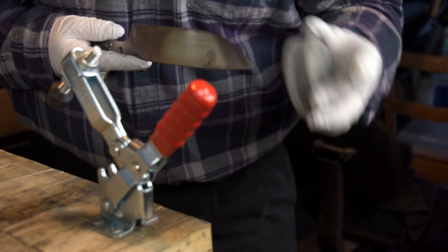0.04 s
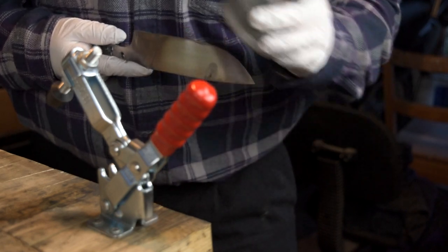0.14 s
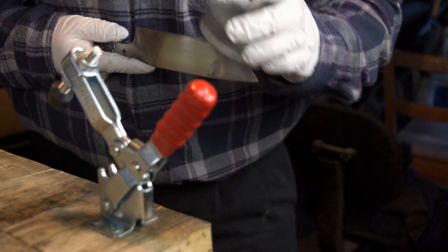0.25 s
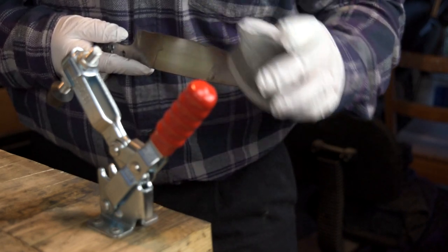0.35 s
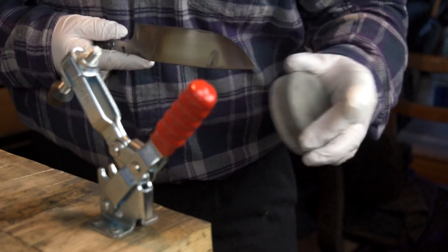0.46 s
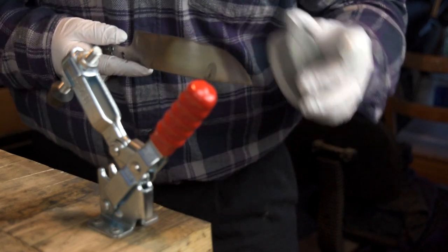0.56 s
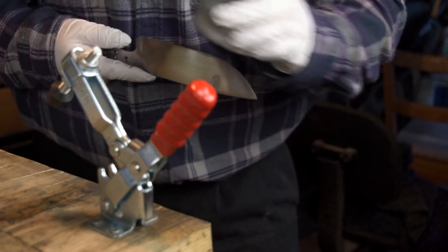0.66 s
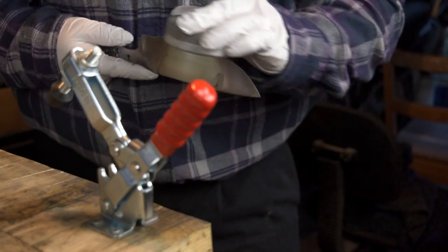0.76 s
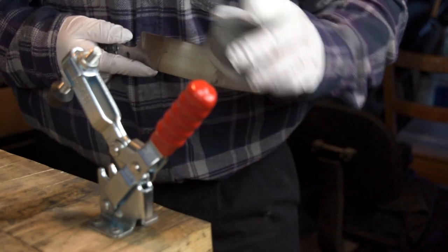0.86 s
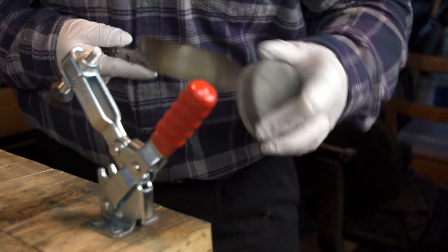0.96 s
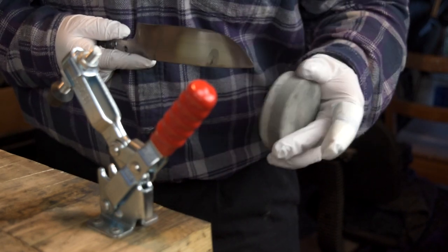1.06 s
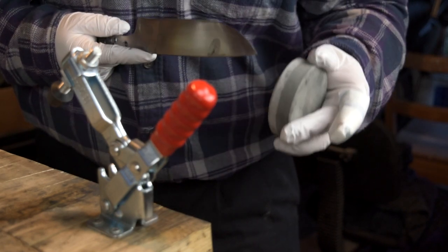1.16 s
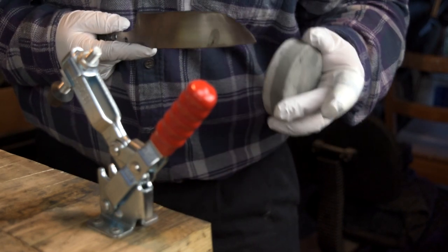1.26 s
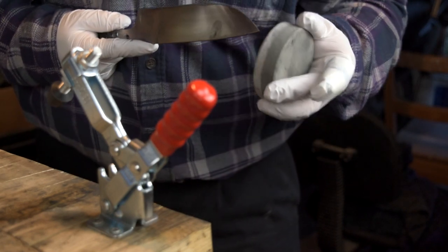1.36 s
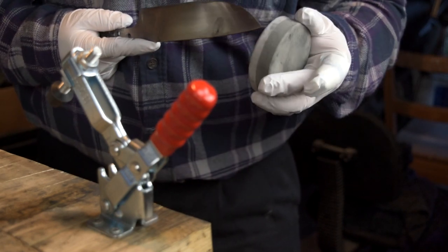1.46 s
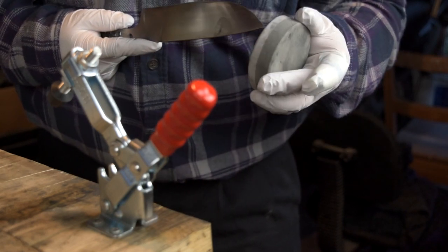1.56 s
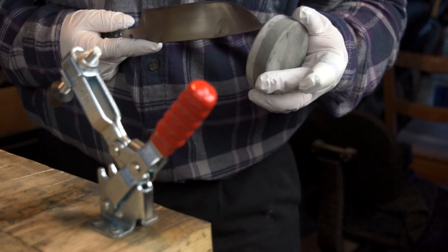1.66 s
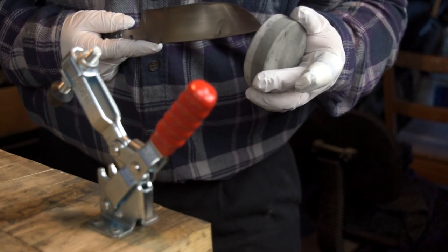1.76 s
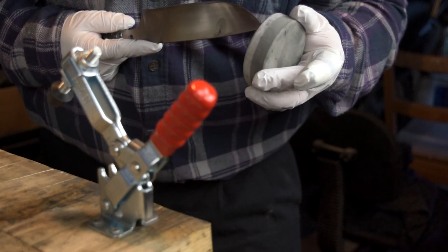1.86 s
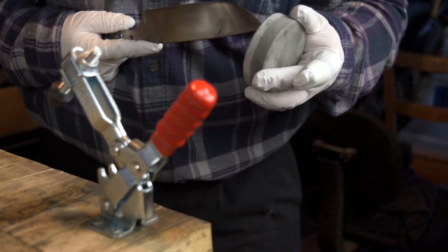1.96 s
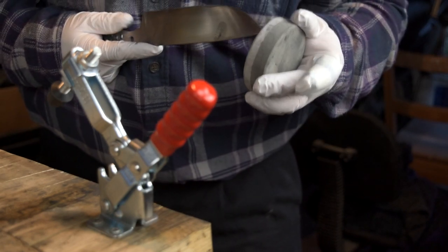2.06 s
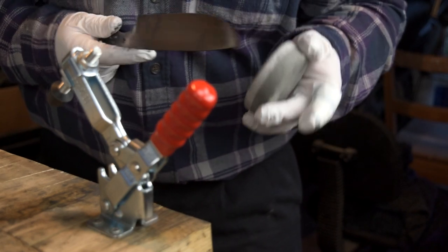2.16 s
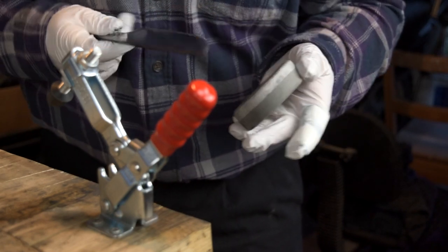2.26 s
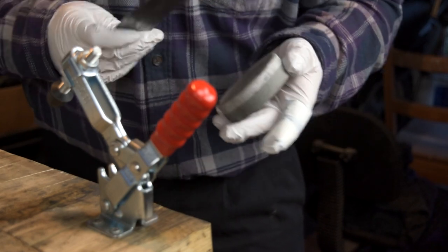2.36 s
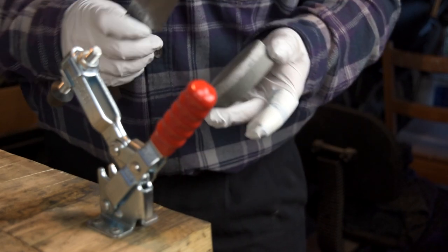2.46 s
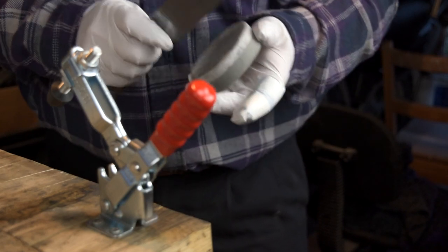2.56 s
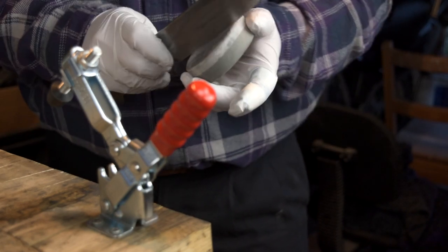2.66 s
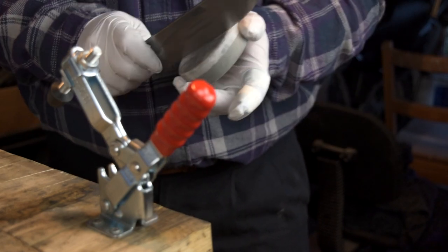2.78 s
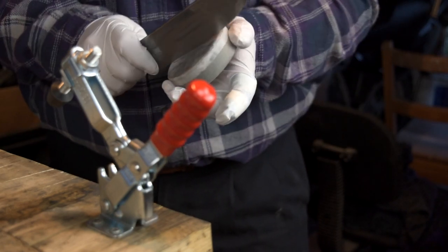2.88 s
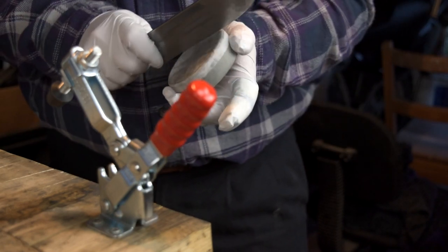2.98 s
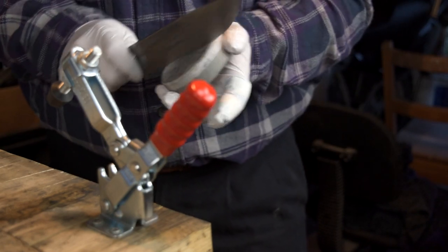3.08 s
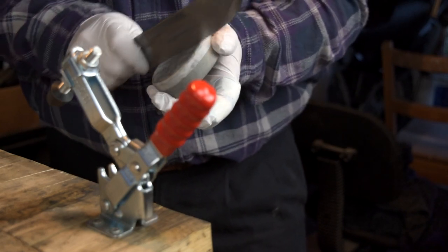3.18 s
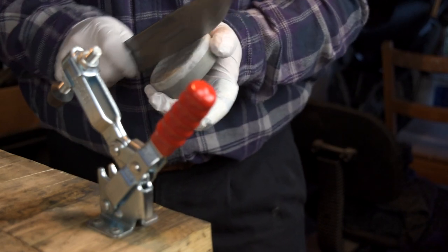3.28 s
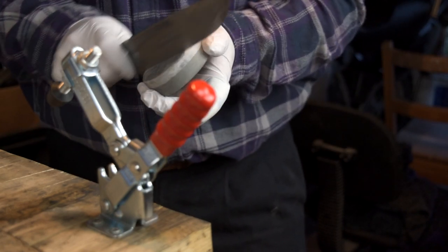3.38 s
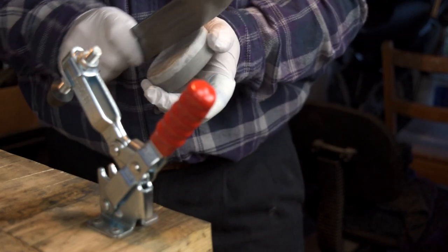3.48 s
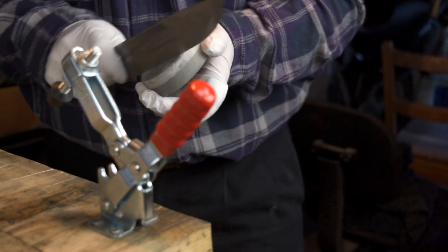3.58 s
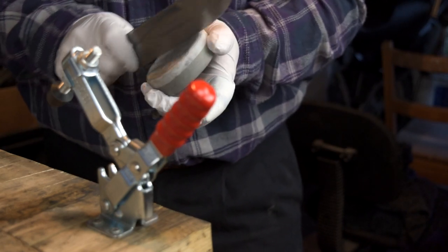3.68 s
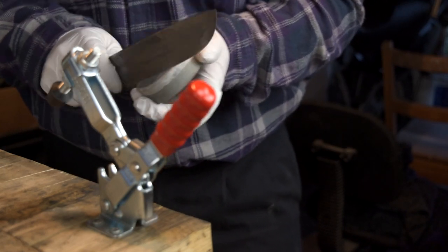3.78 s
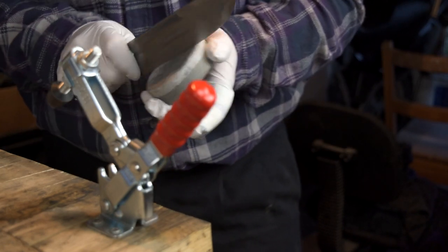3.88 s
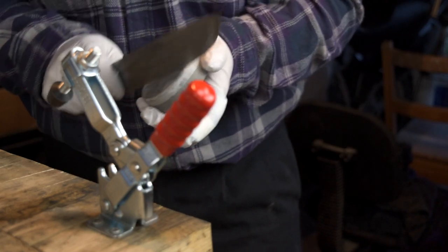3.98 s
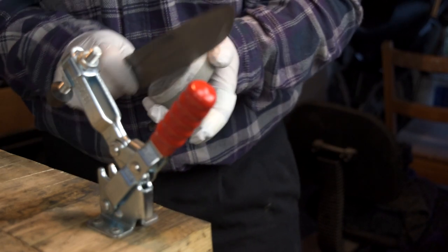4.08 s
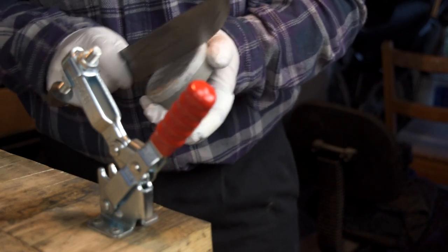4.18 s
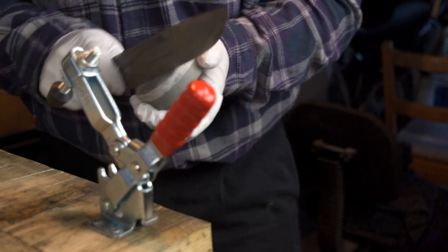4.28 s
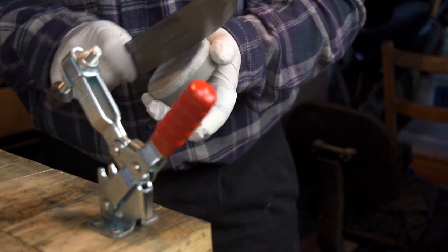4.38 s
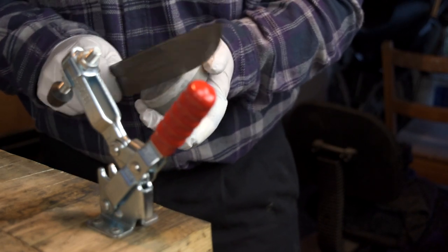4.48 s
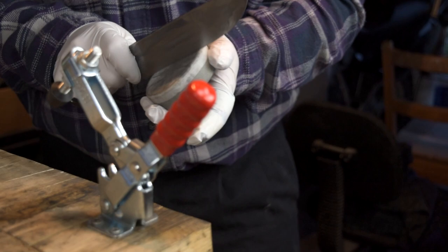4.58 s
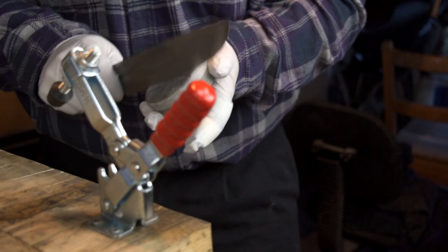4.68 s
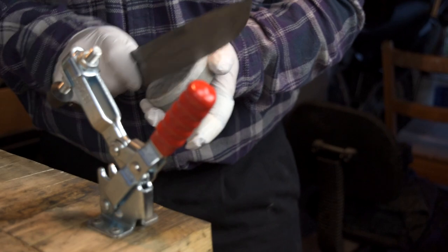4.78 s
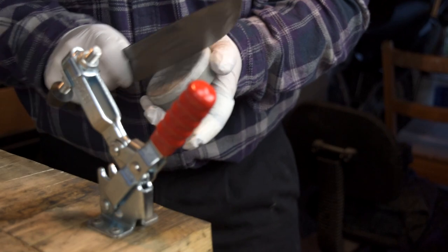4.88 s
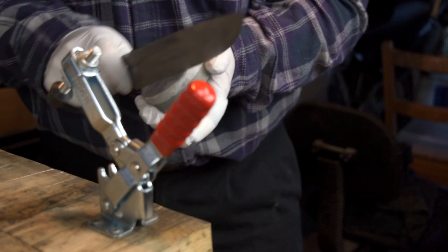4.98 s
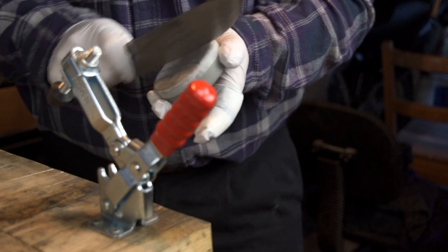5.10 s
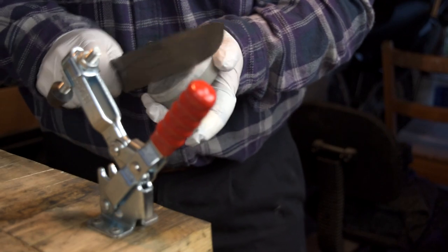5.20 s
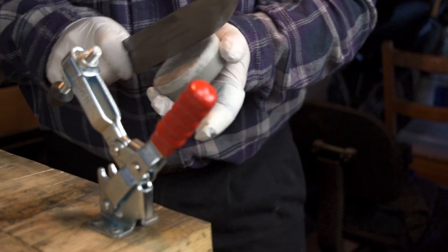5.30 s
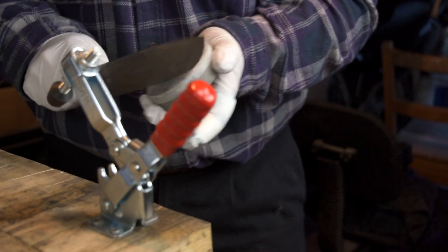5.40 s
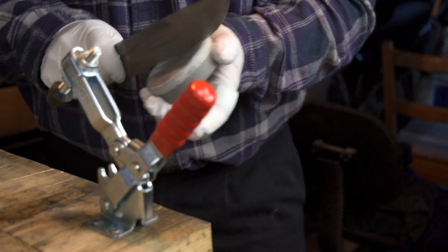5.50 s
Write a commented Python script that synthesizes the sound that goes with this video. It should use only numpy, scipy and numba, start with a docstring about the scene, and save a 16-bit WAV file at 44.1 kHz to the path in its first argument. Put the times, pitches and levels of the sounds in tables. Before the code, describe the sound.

A sharpening stone lands on a steel knife with a short clack at about 0.25 seconds and wipes lightly along the blade. A second clack and scrape follow at 0.75 seconds, brightening as the stone leaves the tip around 1 second. A quieter stretch holds only faint touches on the steel. From about 2.2 seconds a rubber glove slides softly along the blade and a sleeve swishes. At 2.7 seconds a sharp tap makes the blade ring briefly, and the stone clacks down again just after. From 2.9 seconds to the end, around 5.5 seconds, the stone rubs rapidly back and forth, about nine strokes a second, louder, gritty and metallic, with tiny high squeaks. Soft sleeve rustle and faint low thudding from the arms accompany the strokes. The sound is close, in a small, dry workshop with a faint low hum.

```python
"""A round stone hones a steel knife: grit drives the blade's modes, whose gain and pitch wander as the
contact travels. The stone lands with a clack and is wiped off the tip twice; a glove slides and the
blade is tapped as the grip changes; then the stone lands again and rubs quickly to and fro, with
stick-slip squeaks. Sleeves rustle, and the small, dry workshop adds short reflections and a low hum."""
import sys
import numpy as np
from scipy import signal
from scipy.fft import rfft, irfft
from scipy.io import wavfile
from numba import njit

SR = 44100
rng = np.random.default_rng(int(sys.argv[2]) if len(sys.argv) > 2 else 0)


def store_wav(level_fs):
    """Save 16-bit WAV to argv[1]."""
    pcm = np.round(np.clip(np.atleast_2d(level_fs), -1, 1) * 32767)
    wavfile.write(sys.argv[1], SR, pcm.T.astype(np.int16))


N = 244572
TIME = np.arange(N) / SR

# quick strokes, pull and push in turn: start t/s, level/dB, edge-mode gain/dB, nominal bending f/Hz
STROKES = [(2.93, -23, 1.5, 736), (3.056, -23, 2, 850), (3.169, -22.5, 5, 494), (3.295, -23.5, 4.5, 686),
           (3.405, -22.5, 3.5, 593), (3.519, -23, 6, 698), (3.621, -21.5, 1.7, 610),
           (3.737, -23.5, 2.5, 714), (3.841, -21, 4.5, 624), (3.962, -23.5, 5, 705),
           (4.074, -21.5, 3.5, 630), (4.198, -23.5, 5, 735), (4.313, -20.5, -0.5, 673),
           (4.429, -23, 8.5, 794), (4.540, -22.5, 0.5, 710), (4.661, -25.5, -5, 820),
           (4.771, -21, 7.5, 704), (4.901, -24, 6.5, 750), (5.011, -22, 0.5, 710), (5.138, -22, -2.5, 1020),
           (5.23, -23.5, 10.5, 846), (5.358, -22, -8, 945), (5.467, -23, 2.5, 855)]
# modes of the blade under the stone: f/Hz, bandwidth/Hz, push gain/dB, pull gain/dB, wipe gain/dB
BLADE_MODES = [(1150, 590, -14.5, -33.5, -5), (1390, 104, -7.5, -14.5, -4), (1698, 74, -5, -9, -35),
               (1958, 313, -2, -4, -11), (2290, 356, -9, -3.5, -7.5), (2575, 103, -1, 0.5, -31),
               (2880, 390, 2.5, -1.5, -4.5), (3154, 160, -3, 2.5, -5), (3390, 153, 0, -0.5, -10),
               (3857, 330, -3.5, -5.5, -3), (4504, 118, -1, 0.5, -6), (5660, 105, -7.5, -5, -9.5),
               (6924, 146, -7, -5.5, -8), (7775, 87, -11.5, -8, -5.5), (8310, 240, -16.5, -11, -4.5),
               (9600, 180, -8, -9, -20), (10140, 1100, -18.5, -16.5, -6.5), (11270, 220, -14, -9, -10.5),
               (11730, 1250, -14.5, -15.5, -13), (12760, 370, -16, -9, -29), (13980, 110, -22, -31, -16),
               (14120, 380, -13.5, -13.5, -10)]
# coarse grains catching during the strokes: t/s, level/dB
GRAIN_CATCHES = [(2.9705, 2.5), (3.005, -4), (3.070, -9), (4.712, -5), (4.729, -8.5), (4.959, -4)]
# hiss of the grit: f/Hz, spectrum level/dB
GRIT_SPECTRUM = [(350, -4), (700, -5.5), (1500, -2.5), (3000, -1), (5000, 3.5), (9000, 1.5), (13000, -31),
                 (15800, -5.5)]
# glide of the bending resonance: fraction of stroke, frequency ratio on the pull, ratio on the push
BEND_GLIDE = [(.27, 1.06, 1.315), (.53, 0.93, 0.96), (.77, 1.12, .9)]
# stick-slip squeaks: t/s, level/dB, half-width/s
SQUEAKS = [(3.008, -10, 0.0034), (3.444, -12, 0.0053), (3.779, -4.5, 0.0061), (3.825, -7.5, 0.0044),
           (4.036, -7.5, 0.0032), (4.488, -7.5, 0.0064), (4.96, -5.5, 0.0036), (5.047, -13, .009),
           (5.282, -8.5, 0.011)]
# slow wipes: start t/s, duration/s, level/dB, dulling on landing/dB, tip t/s, swell at the tip/dB
WIPES = [(0.249, 0.22, -35.5, 5.5, 0.43, -0.5), (0.758, 0.27, -33.5, 26, 1.009, 6),
         (2.829, 0.1137, -38.5, 29, 2.921, -1)]
# the stone landing flat on the blade: t/s, level/dB, f/Hz
KNOCKS = [(0.2515, 1, 1540), (0.2546, -2.5, 2220), (0.761, 0.5, 1660), (2.8252, -6, 2740),
          (2.8270, 1, 1950)]
# modes of stone and blade together: f/Hz, level/dB, T60/s
CLACK_MODES = [(740, -24, 0.011), (2570, -9.5, 0.0064), (2800, -12.5, 0.026), (3320, -11, 0.013),
               (5500, -18.5, 0.002), (7580, -31, 0.027), (8600, -28, 0.04), (11400, -34, 0.0063),
               (13600, -33, .01)]
# light touches, and the blade springing free: t/s, level/dB, damping factor (about 1 when free)
TAPS = [(1.012, -14, 1.6), (1.754, -19.5, 3.5), (2.102, -25, 2.2), (2.193, -26, 3), (2.528, -15.5, 3.3),
        (2.691, 0.5, 0.92)]
# modes of the free blade: f/Hz, level/dB, T60/s
FREE_MODES = [(680, -16, 0.0015), (2100, -0.5, 0.0019), (2570, -21, 0.1), (3710, -40, 0.13),
              (5650, -19, 0.034), (6971, -18, 0.034), (7730, -23.5, 0.052), (8260, -22, .012),
              (9800, -22.5, 0.029), (11500, -25, .014), (14000, -33, .016)]
# the glove sliding along the blade: t/s, half-width/s, level/dB, treble gain/dB
GLOVE_SLIDES = [(2.263, 0.075, -57.5, 11), (2.43, 0.021, -47, -15), (2.536, 0.019, -43.5, -2),
                (2.55, 0.17, -50.5, -5)]
# resonances excited by the glove: f/Hz, bandwidth/Hz, level/dB
GLOVE_MODES = [(3250, 650, -1), (4500, 140, -2.5), (5670, 370, -10), (6950, 150, -12), (8000, 450, -11.5)]
# thudding of the arms: f/Hz, bandwidth/Hz, level at the first stroke/dB, level at the last/dB
ARM_BANDS = [(55.6, 26, -47, -59), (91.3, 19, -63.5, -40.5), (125, 33, -57, -56.5)]
# dull rub of the sleeves, growing as the arms start work: t/s, level/dB
SLEEVE_LEVELS = [(0, -52.5), (.4, -52.5), (1.1, -52), (1.9, -52), (2.25, -46.5), (5.55, -46)]
# colour of that rub: f/Hz, spectrum level/dB
RUB_SPECTRUM = [(120, -3), (200, -8.5), (348, -10), (407, -5.5), (854, -4), (985, -5.5), (1120, -6),
                (6000, -38), (7800, -72), (13200, -120)]
# a sleeve swinging past: t/s, half-width/s, level/dB
SWISHES = [(0.045, 0.13, -49.5), (1.077, .2, -60.5), (2.455, .26, -49.5)]
# colour of the swish: f/Hz, spectrum level/dB
SWISH_SPECTRUM = [(880, -33), (1500, -16), (2020, -6.5), (3270, -0.5), (3820, -8.5), (4500, -5.5),
                  (5050, -16), (8250, -24), (15000, -34)]
# wavering room hum: f/Hz, bandwidth/Hz, level/dB
HUM_BANDS = [(58.7, 4.8, -56), (174.6, 8.8, -55), (212, 6.4, -60.5)]
# room rumble: f/Hz, spectrum level/dB
ROOM_SPECTRUM = [(15, -16), (30, -3), (50, -17), (110, 0), (230, -7.5), (300, -14.5), (500, -11),
                 (800, -38), (1200, -12), (2000, -27), (4300, -33.5), (15000, -34)]

TOUCH_S, ATTACK_S, LAST_TURN_S = 2.943, 0.0076, 5.58   # the stone meets the blade already moving
FASTEST_PULL, FASTEST_PUSH = 0.43, 0.46   # fraction of a stroke at which speed peaks
PULL_TREBLE_DB, PUSH_TREBLE_DB = 1.53, 4
BITE_DB, BITE_S = 4, 0.017   # sharp scratch at first contact
FLEX_DB, FLEX_PER_EDGE_DB = -4.5, -0.37   # on its edge the blade sings, laid flat it bends
FLEX_LAG_DB, FLEX_BUILD_S = 6, 0.12   # the hands need a moment to lean on the blade
SQUEAK_HZ, SQUEAK_WAVER = 3397, 0.0069
SING_DB, SING_SPREAD_DB = -7.5, 3.5   # weaker, chance squeaks, relative to their drive
LANDING_DB, SETTLE_S, LIFT_S, TIP_S = 17.5, 0.018, 0.0099, 0.016   # pressure envelope of a wipe
SLIDE_BRIGHT_DB, GATHER_BRIGHT_DB, TIP_BRIGHT_DB = 0.5, 4.5, 4.5   # speed and the thin tip add treble
FULL_WIPE_S = 0.23   # time to cross the blade; a shorter wipe stays near the heel
CONTACT_END_HZ, CONTACT_MID_HZ = 1900, 2740
WIPE_FLEX_END_DB, WIPE_FLEX_MID_DB = -6, -22   # the blade bends most at heel and tip


def honing():
    """Sliding friction: the speed and pressure of each stroke set the force of the grit on the steel."""
    start, stroke_db, stroke_edge_db, mid_hz = np.transpose(STROKES)
    turns = np.append(start, LAST_TURN_S)
    length = np.diff(turns)
    fastest = start + np.resize([FASTEST_PULL, FASTEST_PUSH], len(start)) * length
    half_strokes = np.sort(np.append(turns, fastest))
    phase = np.interp(TIME, half_strokes, np.arange(len(half_strokes)) / 2)   # one unit a stroke
    velocity = np.sin(np.pi * phase)
    speed = np.abs(velocity)
    pull = np.clip(0.5 + 1.9 * velocity, 0, 1)
    # each stroke holds its own pressure and ring, changing over at the turns
    held = np.ravel([start + 0.2 * length, start + 0.8 * length], order="F")
    level_db = np.interp(TIME, held, np.repeat(stroke_db, 2))
    edge_db = np.interp(TIME, held, np.repeat(stroke_edge_db, 2))
    age = np.maximum(TIME - TOUCH_S, 0)
    touching = np.minimum(age / ATTACK_S, 1)
    effort = touching * from_db(level_db + BITE_DB * np.exp(-age / BITE_S) + 1.38 * drift(46))
    friction = effort * (0.21 + np.tanh(1.084 * speed ** 2.08))   # never quite stops; saturates at speed
    grains = grit(per_s=14000, spread_db=3)
    catches = from_db(11.5) * cut(clicks(GRAIN_CATCHES), 3700, "low", order=1)
    gains_db = stroke_gains(pull, speed, edge_db)
    steel = from_db(-1) * blade(grains * friction + catches, gains_db, wander_db=3, detune=0.0038)
    hiss = from_db(-5) * coloured(grains, GRIT_SPECTRUM) * friction
    lag_db = FLEX_LAG_DB * np.exp(-age / FLEX_BUILD_S)
    flex_db = FLEX_DB + FLEX_PER_EDGE_DB * edge_db + drift(3.8) - lag_db
    load = effort * from_db(flex_db) * (0.085 + speed ** 2.4)
    flexing = bending(load, friction, phase, bend_pitch(start, length, mid_hz))
    return steel + hiss + flexing + touching * arms() + squeaks(effort * speed * from_db(edge_db))


def stroke_gains(pull, speed, edge_db):
    """Modal coupling: direction, speed and edge contact set the drive of each mode, in dB."""
    treble_db = PUSH_TREBLE_DB + (PULL_TREBLE_DB - PUSH_TREBLE_DB) * pull
    slow_db = -2.2 * (1 - speed)   # slow grains are duller
    return [push_db + (pull_db - push_db) * pull
            + (hz > 5000) * treble_db + (hz > 9000) * slow_db + (3200 < hz < 3600) * edge_db
            for hz, _, push_db, pull_db, _ in BLADE_MODES]


def blade(force, gains_db, wander_db, detune):
    """Modal superposition: the travelling contact feeds each mode unevenly and bends its pitch."""
    out = np.zeros(N)
    for k, ((hz, width_hz, *_), db) in enumerate(zip(BLADE_MODES, gains_db)):
        drive = force * from_db(db + wander_db * drift(10.1))
        mode_hz = hz * (1 + detune * drift(6.7))
        out += (-1) ** k * resonance(drive, mode_hz, width_hz)   # neighbours swing in opposite sense
    return cut(out, 840, "high")


def bending(load, friction, phase, bend_hz):
    """Flexural resonance: one mode glides, one stays, and a deeper one is excited in mid-stroke."""
    drive = grit(per_s=6000, spread_db=1) * load
    mid_stroke = np.sin(np.pi * (phase % 1) ** 1.54) ** 2
    gliding = from_db(3.5) * resonance(drive, bend_hz, width_hz=210)
    deep = from_db(-6.5) * resonance(drive * mid_stroke, 0.635 * bend_hz, width_hz=127)
    steady = from_db(-11) * resonance(grit(per_s=6500, spread_db=5) * friction, 750, width_hz=260)
    return cut(cut(gliding - deep + steady, 310, "high", order=4), 1900, "low")


def bend_pitch(start, length, mid_hz):
    """A moving support retunes a beam: the bending frequency in Hz through the strokes."""
    fraction, *ratios = np.transpose(BEND_GLIDE)
    times = start[:, None] + length[:, None] * fraction
    pitches = [hz * ratios[k % 2] for k, hz in enumerate(mid_hz)]
    return np.interp(TIME, times.ravel(), np.ravel(pitches))


def squeaks(drive):
    """Stick-slip oscillation briefly sustains the edge mode, with a weak second harmonic."""
    swell = sum(from_db(db) * bell(s, half_s) for s, db, half_s in SQUEAKS)
    chance_db = SING_DB + SING_SPREAD_DB * np.minimum(drift(38.7), 1.5)
    swell = np.maximum(swell, drive * from_db(chance_db))
    hz = SQUEAK_HZ * (1 + SQUEAK_WAVER * drift(30))
    angle = 2 * np.pi * np.cumsum(hz) / SR
    return swell * (np.sin(angle) + from_db(-17) * swell * np.sin(2 * angle))


def wipes():
    """Light friction: a slow pass drives the blade and a contact resonance that is highest mid-blade."""
    pressure, bright_db, arch = sum(wipe_motion(*row) for row in WIPES)
    contact_hz = CONTACT_END_HZ + (CONTACT_MID_HZ - CONTACT_END_HZ) * arch
    flex_db = WIPE_FLEX_END_DB + (WIPE_FLEX_MID_DB - WIPE_FLEX_END_DB) * arch
    effort = pressure * from_db(2.9 * drift(88))
    grains = grit(per_s=9000, spread_db=3)
    force = grains * effort
    gains_db = [db + bright_db * np.clip(np.log2(hz / 3000), -0.2, 1) for hz, *_, db in BLADE_MODES]
    steel = from_db(-9.5) * blade(force, gains_db, wander_db=3.5, detune=0.0065)
    contact = from_db(-6 + 3.9 * arch) * cut(resonance(force, contact_hz, width_hz=450), 5000, "low")
    flexing = from_db(flex_db - 2.5) * cut(resonance(force, 780, width_hz=390), 1900, "low")
    hiss = from_db(-7 + 0.92 * bright_db) * effort * coloured(grains, GRIT_SPECTRUM)
    crackle = resonance(grit(per_s=7500, spread_db=11), 5140, width_hz=900)
    tip = cut(from_db(-13.5 + bright_db) * effort * crackle, 6400, "low")
    return steel + contact + flexing + hiss + tip


def wipe_motion(start, length, level_db, dull_db, tip_s, tip_db):
    """Contact loading as the stone lands, slides and lifts: pressure, brightness, arch (1 mid-blade)."""
    age = np.clip(TIME - start, 0, length)
    fraction = age / length
    touching = (age > 0) * np.clip((length - age) / LIFT_S, 0, 1)
    landing, tip = np.exp(-age / SETTLE_S), bell(tip_s, TIP_S)
    pressure = from_db(level_db + LANDING_DB * landing + tip_db * tip)
    slide_db = SLIDE_BRIGHT_DB + GATHER_BRIGHT_DB * fraction ** 2
    bright_db = slide_db - dull_db * np.sqrt(landing) + TIP_BRIGHT_DB * tip
    arch = np.sin(np.pi * fraction ** 1.3) * min(length / FULL_WIPE_S, 1)
    return touching * np.array([pressure, bright_db, arch])


def knocks():
    """Damped impact: the stone smothers the blade as it lands, so it only clacks."""
    blows = clicks([(s, db) for s, db, _ in KNOCKS])
    dull = sum(ring(clicks([(s, db)]), hz, t60=0.008) for s, db, hz in KNOCKS)
    hard = struck(blows, CLACK_MODES)
    return cut(from_db(-2) * dull + hard, 340, "high", order=1)   # a thin blade radiates little bass


def taps():
    """Free vibration: a glancing touch lets the steel ring, briefly when a finger damps it."""
    return sum(struck(clicks([(s, db)]), FREE_MODES, damping) for s, db, damping in TAPS)


def glove():
    """Friction of rubber on steel: a soft hiss filtered by the blade's resonances."""
    body = sum(from_db(db) * bell(s, half_s) for s, half_s, db, _ in GLOVE_SLIDES)
    treble = sum(from_db(db + treble_db) * bell(s, half_s) for s, half_s, db, treble_db in GLOVE_SLIDES)
    grains = grit(per_s=16000, spread_db=4)
    return sum(resonance(grains * from_db(db) * (treble if hz > 5000 else body), hz, width_hz)
               for hz, width_hz, db in GLOVE_MODES)


def arms():
    """Low-frequency noise bands: the working arms thud, the balance shifting over the strokes."""
    first_s = STROKES[0][0]
    progress = np.clip((TIME - first_s) / (LAST_TURN_S - first_s), 0, 1)
    return sum(from_db(first_db + (last_db - first_db) * progress) * narrow_noise(hz, width_hz)
               for hz, width_hz, first_db, last_db in ARM_BANDS)


def sleeves():
    """Cloth friction: flannel gives a dull, continuous rub, and a swish as a sleeve swings past."""
    rub_db = np.interp(TIME, *np.transpose(SLEEVE_LEVELS))
    rub = from_db(rub_db + drift(15)) * coloured(rng.standard_normal(N), RUB_SPECTRUM)
    swing = sum(from_db(db) * bell(s, half_s) for s, half_s, db in SWISHES)
    swing += from_db(rub_db - 19.5)   # a little swish always comes with the rub
    swish = swing * from_db(2 * drift(38)) * coloured(grit(per_s=8300, spread_db=-0.5), SWISH_SPECTRUM)
    return rub + swish


def workshop(x, t60, wall_hz, first_s):
    """Reverberation: dense, dull reflections from the bench and cluttered walls decay exponentially."""
    t = TIME[:SR // 2]
    onset = np.clip(t / first_s - 1, 0, 1)
    tail = rng.standard_normal(len(t)) * from_db(-60 * t / t60) * onset
    tail = cut(tail / np.sqrt(np.sum(tail ** 2)), wall_hz, "low", order=1)
    return signal.fftconvolve(x, tail)[:N]


def background():
    """Ambient noise: a broad, low rumble and a faint narrow-band hum."""
    hum = sum(from_db(db) * narrow_noise(hz, width_hz) for hz, width_hz, db in HUM_BANDS)
    return hum + from_db(-50.5) * coloured(rng.standard_normal(N), ROOM_SPECTRUM)


def grit(per_s, spread_db):
    """Shot noise, as of grains snapping past steel: random impulses of uneven size; rms 1."""
    sizes = from_db(spread_db * np.minimum(rng.exponential(1, N), 4))
    return rms_one((rng.random(N) < per_s / SR) * sizes * rng.choice([-1, 1], N))


def clicks(rows):
    """Impulsive force: one impulse for each (t/s, level/dB) row."""
    out = np.zeros(N)
    for s, db in rows:
        out[round(s * SR)] += from_db(db)
    return out


def struck(force, modes, damping=1):
    """Impact response: a sum of decaying modes of alternating sign."""
    return sum((-1) ** k * from_db(db) * ring(force, hz, t60 / damping)
               for k, (hz, db, t60) in enumerate(modes))


def ring(x, hz, t60):
    """Damped oscillator: a unit impulse starts a decaying sine of amplitude 1."""
    r, w = from_db(-60 / (t60 * SR)), 2 * np.pi * hz / SR
    return signal.lfilter([0, np.sin(w)], [1, -2 * r * np.cos(w), r * r], x + 1e-18)


def resonance(x, hz, width_hz):
    """Forced resonance at a constant frequency, or following the curve hz."""
    return glide(x, 2 * np.pi * hz / SR * np.ones(N), np.exp(-np.pi * width_hz / SR))


@njit
def glide(x, w, r):
    """Two-pole band-pass with moving centre w and pole radius r; white noise keeps its power."""
    y = np.zeros(len(x))
    gain = np.sqrt((1 - r * r) / 2)
    for i in range(2, len(x)):
        y[i] = gain * (x[i] - x[i - 2]) + (1 + r * r) * np.cos(w[i]) * y[i - 1] - r * r * y[i - 2]
    return y


def narrow_noise(hz, width_hz):
    """Narrow-band noise: a tone that wavers in level and pitch; rms 1."""
    band = resonance(rng.standard_normal(N), hz, 2 * width_hz)
    return rms_one(resonance(band, hz, 2 * width_hz))


def drift(rate_hz):
    """Random modulation: noise low-passed at rate_hz; rms 1."""
    step, warm_up = 40, 2000
    r = np.exp(-2 * np.pi * rate_hz * step / SR)
    noise = rng.standard_normal(N // step + warm_up + 2)
    slow = signal.lfilter([1], [1, -2 * r, r * r], noise)[warm_up:]
    return np.interp(np.arange(N) / step, np.arange(len(slow)), rms_one(slow))


def coloured(x, spectrum):
    """Spectral shaping by a curve of (f/Hz, level/dB) points; rms 1."""
    hz, db = np.transpose(spectrum)
    bins = np.maximum(np.fft.rfftfreq(N, 1 / SR), 1)
    gain = from_db(np.interp(np.log(bins), np.log(hz), db))
    return rms_one(irfft(rfft(x) * gain, N))


def cut(x, hz, kind, order=2):
    """Maximally flat high- or low-pass filter."""
    return signal.sosfilt(signal.butter(order, hz, kind, fs=SR, output="sos"), x)


def bell(s, half_s):
    """Bell-shaped envelope: 1 at time s, 1/e at half_s to either side."""
    return np.exp(-np.minimum(((TIME - s) / half_s) ** 2, 60))


def from_db(db):
    """Decibels to amplitude ratio."""
    return 10 ** (np.asarray(db) / 20)


def rms_one(x):
    """Normalisation to unit rms."""
    return x / np.sqrt(np.mean(x ** 2) + 1e-20)


def scene():
    """Superposition: the direct sound of stone on steel, its reflections, sleeves and a quiet room."""
    work = honing() + wipes() + knocks() + taps() + glove()
    room = from_db(-14) * workshop(work, t60=0.21, wall_hz=6070, first_s=0.0012)
    return (work + room + sleeves() + background())[None]


def record(dry):
    """Clipping and band-limiting: peaks stop at full scale, then a steep low-pass cuts the top."""
    cutoff_hz = 15750
    steep = signal.ellip(10, 0.1, 80, cutoff_hz, fs=SR, output="sos")
    return signal.sosfilt(steep, np.clip(dry, -1, 1))


dry = scene()
out = record(dry)
store_wav(out)
```